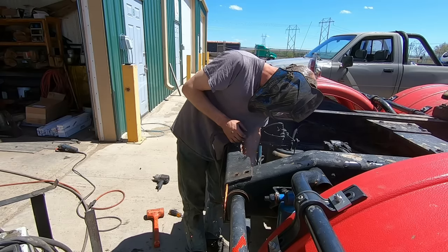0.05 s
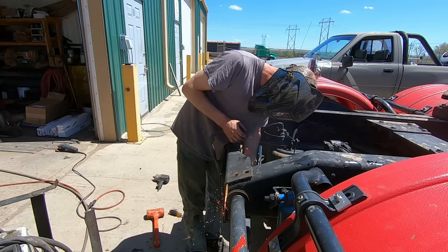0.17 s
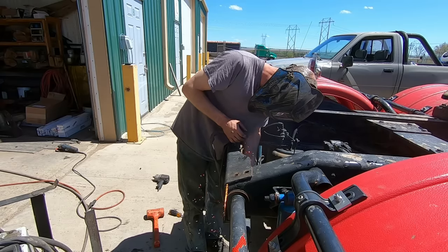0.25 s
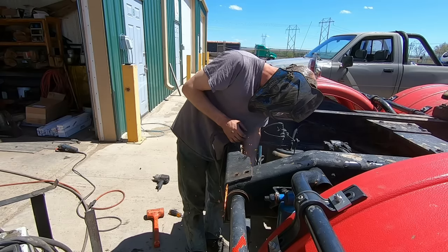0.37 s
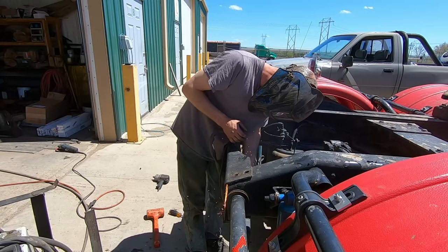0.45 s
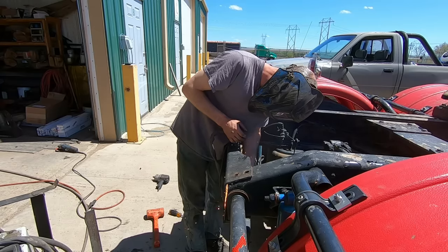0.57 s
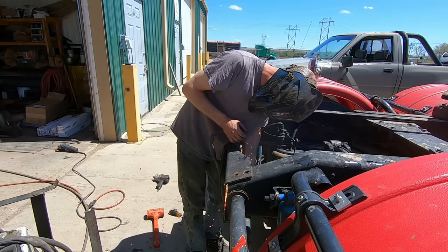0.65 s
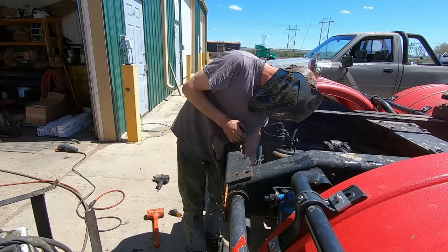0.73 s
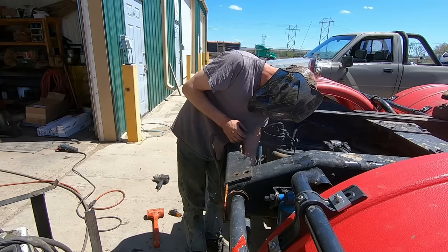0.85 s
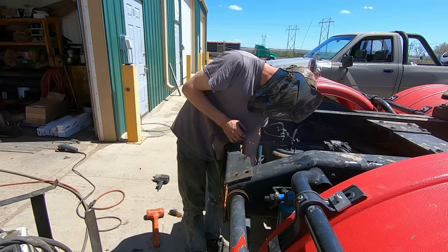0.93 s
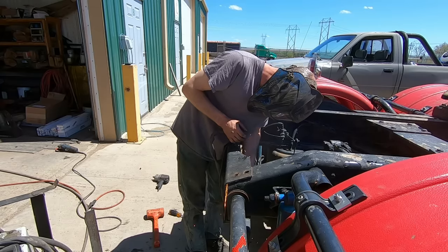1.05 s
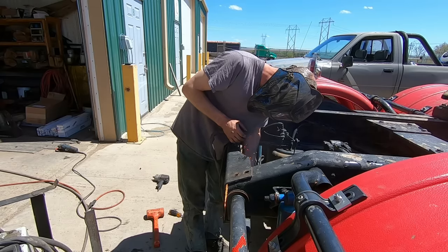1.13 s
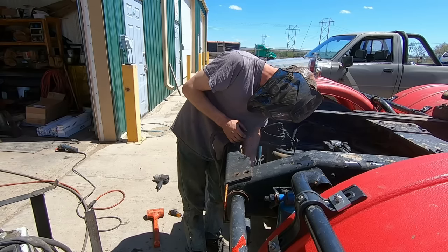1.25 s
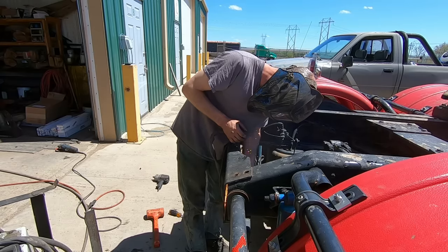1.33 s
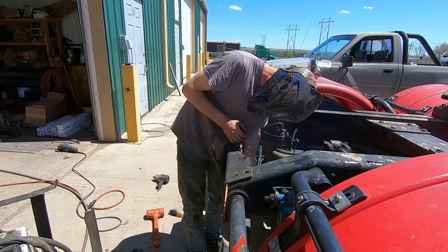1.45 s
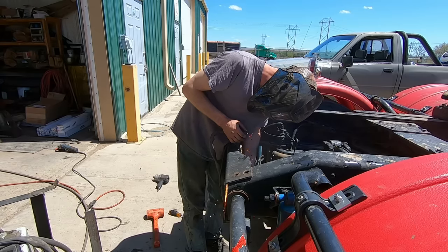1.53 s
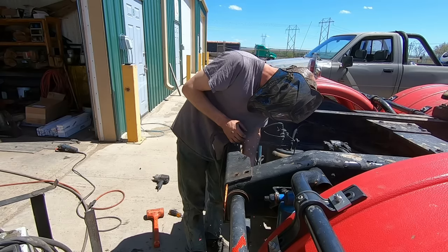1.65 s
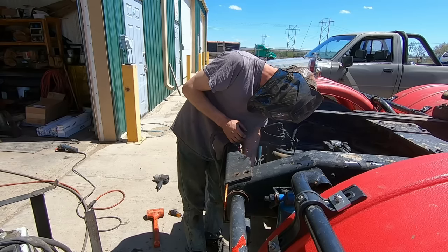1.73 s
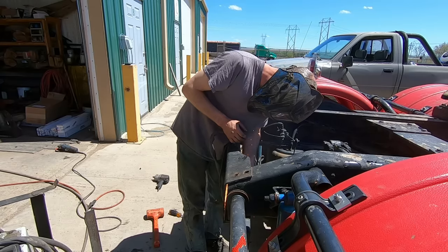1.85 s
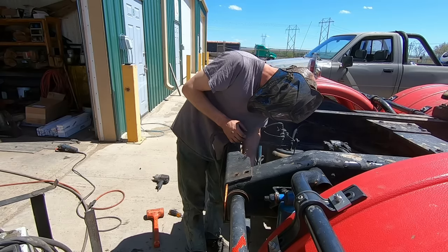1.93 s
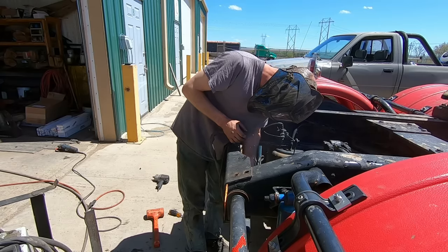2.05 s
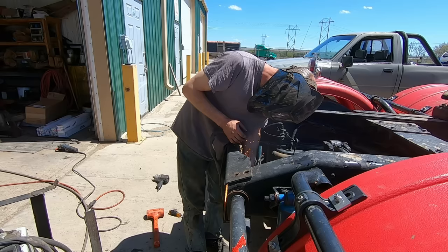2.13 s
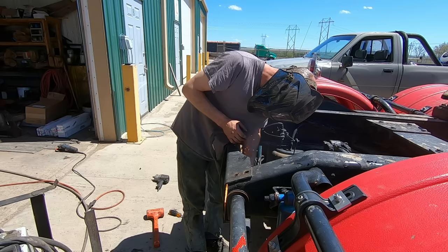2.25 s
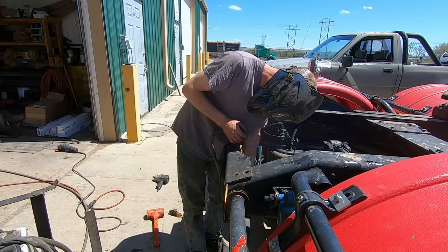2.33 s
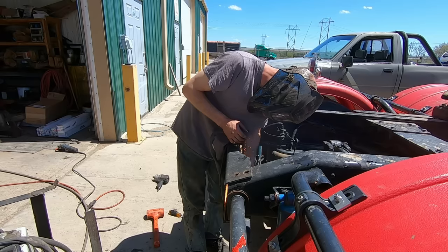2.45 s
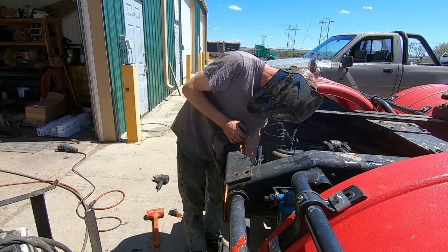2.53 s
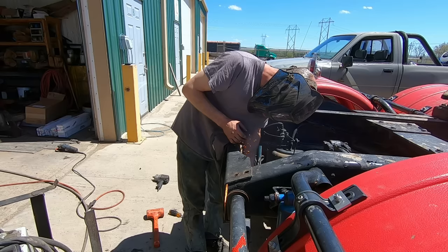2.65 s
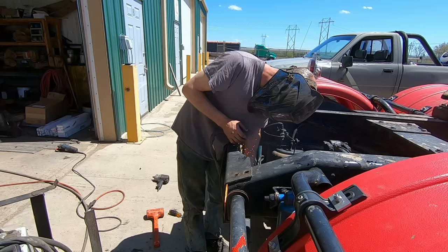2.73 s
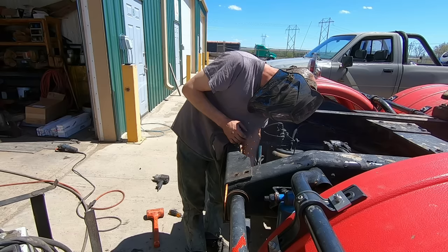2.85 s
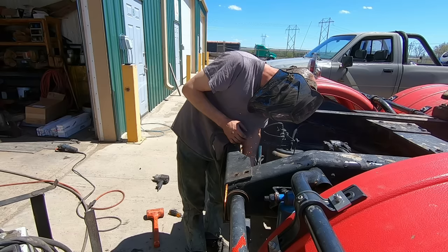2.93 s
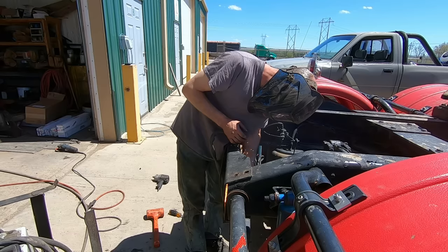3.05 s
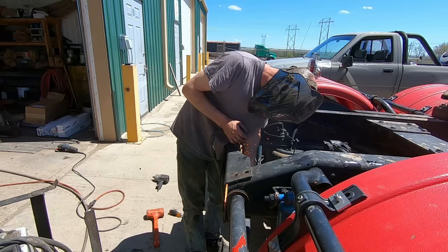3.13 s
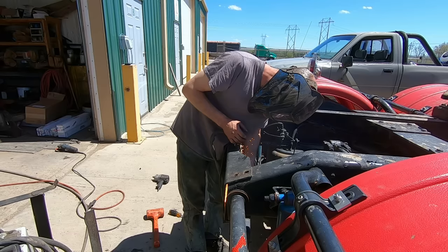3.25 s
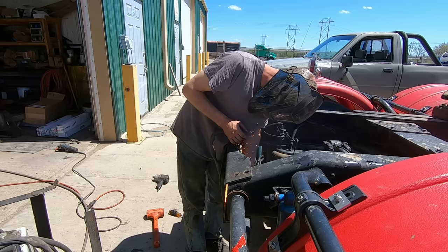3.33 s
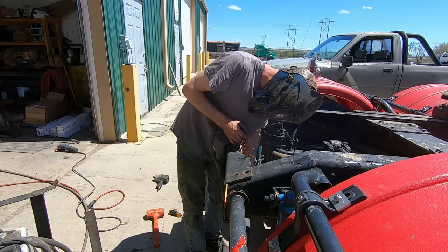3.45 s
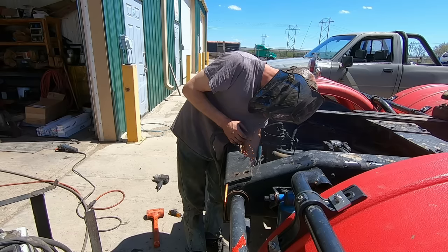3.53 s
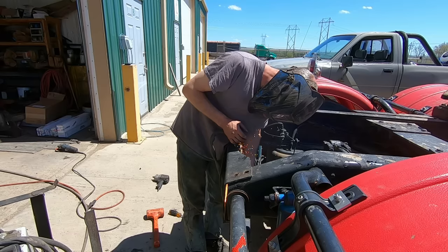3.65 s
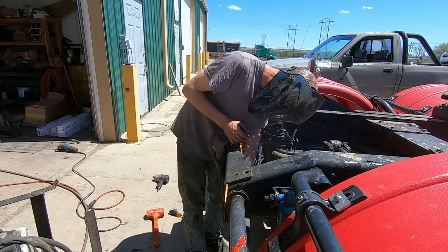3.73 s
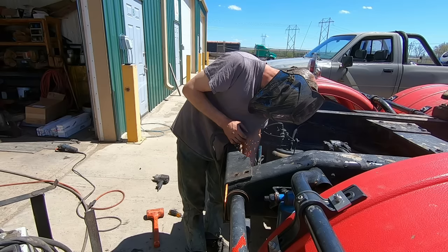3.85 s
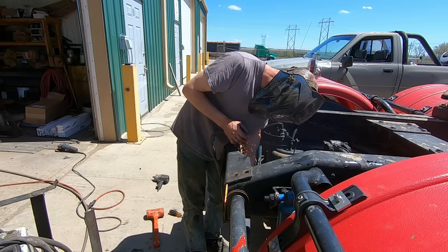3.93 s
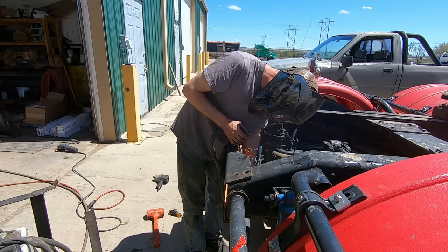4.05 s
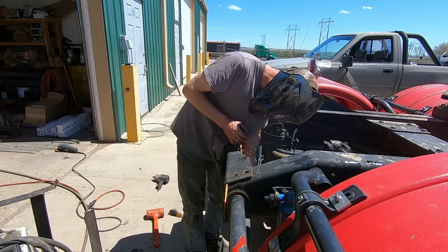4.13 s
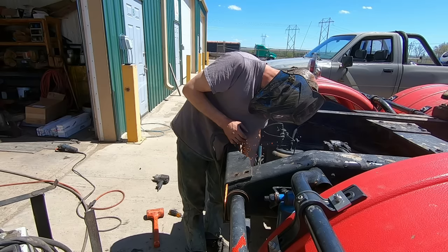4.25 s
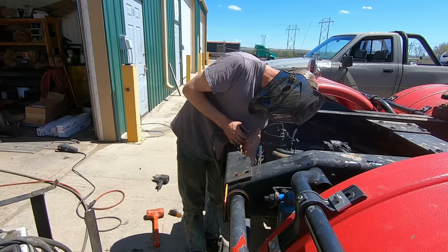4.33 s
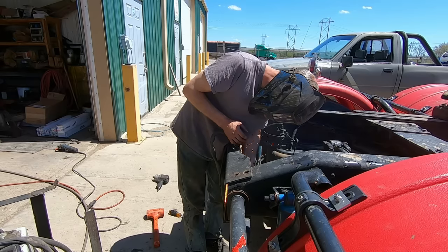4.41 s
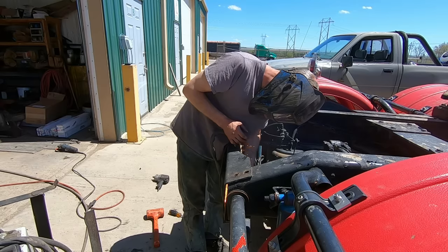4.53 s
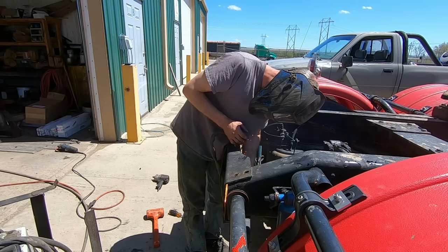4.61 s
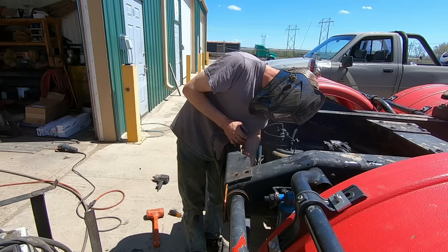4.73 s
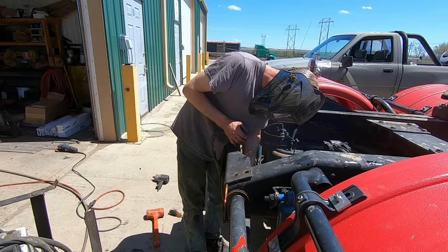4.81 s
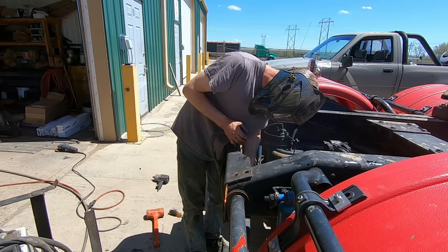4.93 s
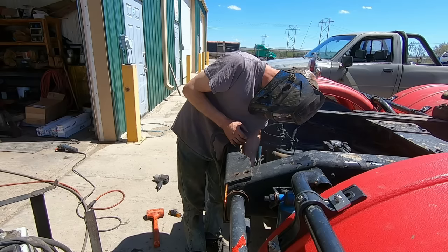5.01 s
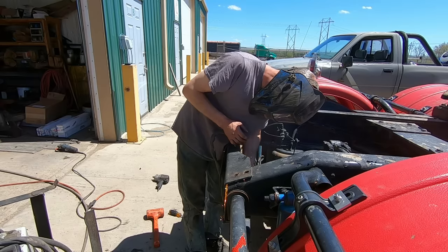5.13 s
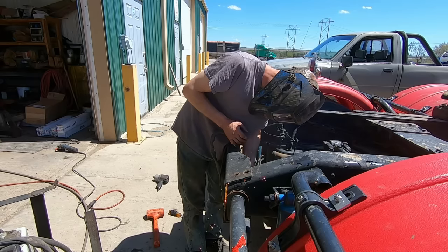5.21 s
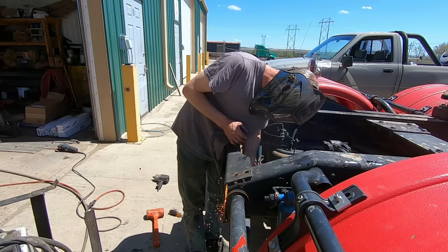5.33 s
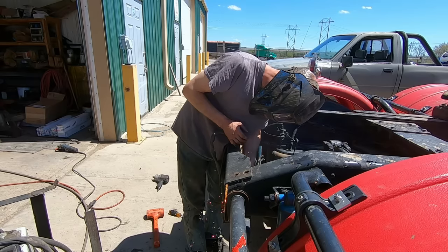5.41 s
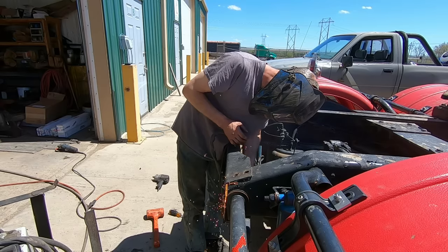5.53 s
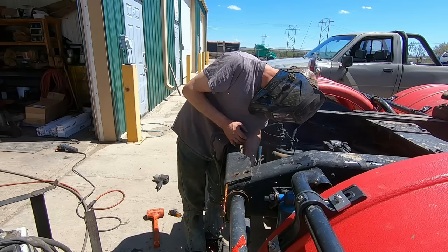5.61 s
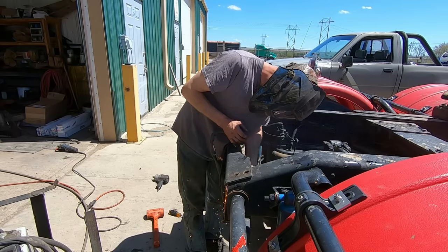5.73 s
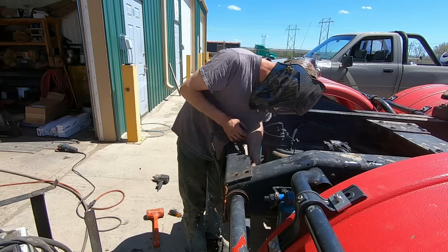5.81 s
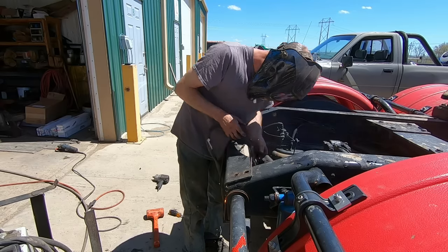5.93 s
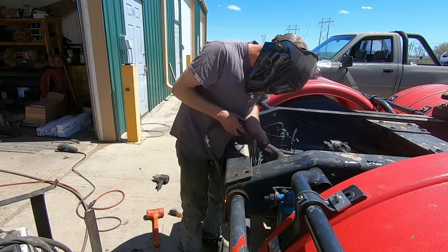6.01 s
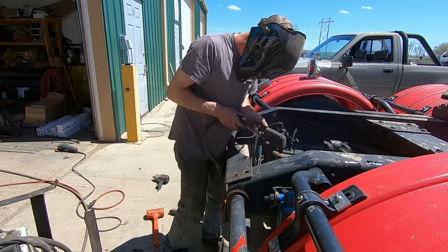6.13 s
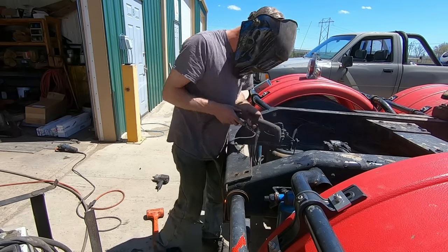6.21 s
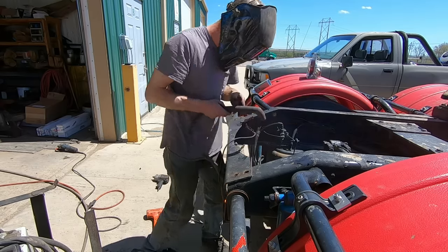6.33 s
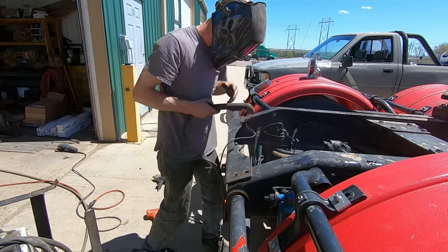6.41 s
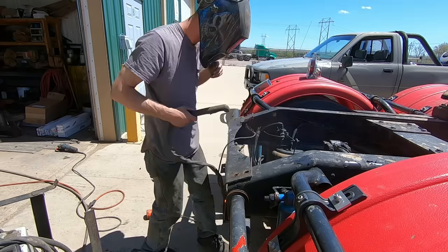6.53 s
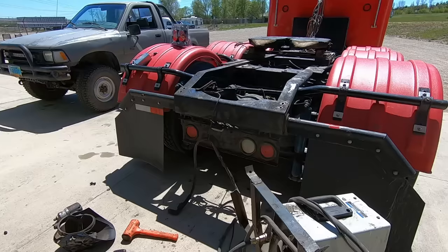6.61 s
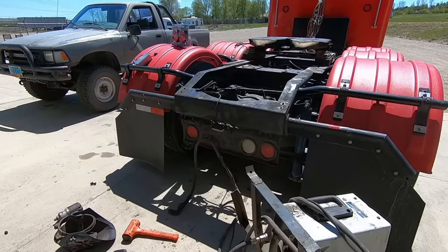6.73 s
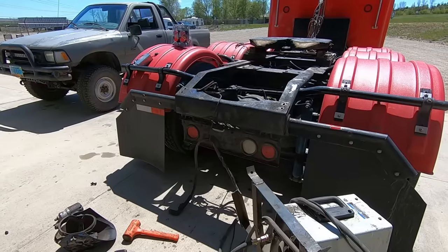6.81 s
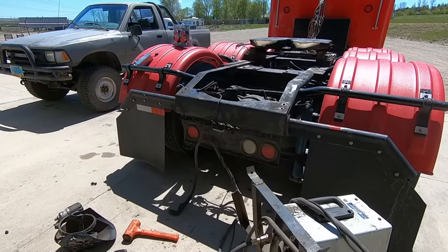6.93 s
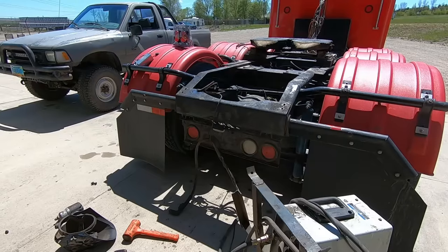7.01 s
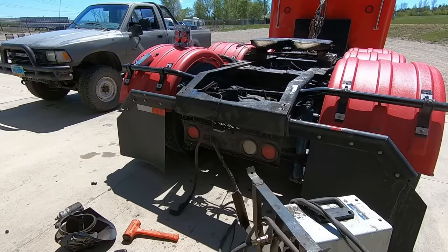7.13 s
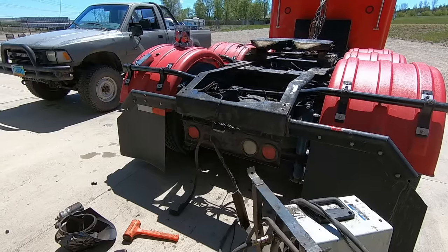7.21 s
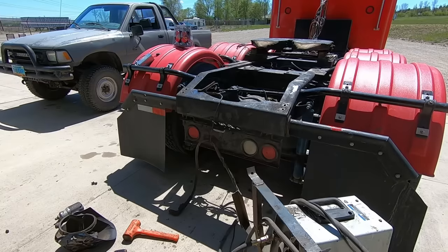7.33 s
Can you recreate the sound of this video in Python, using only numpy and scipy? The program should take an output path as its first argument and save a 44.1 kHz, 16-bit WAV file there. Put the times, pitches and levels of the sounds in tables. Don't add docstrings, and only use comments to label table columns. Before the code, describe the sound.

Harsh sputtering jet hiss over a faint engine idle, a low pop as the arc dies, airy whistle, brief silence, then buffeting wind and creaks.

```python
import sys
import numpy as np
from scipy import signal
from scipy.fft import rfft, irfft, next_fast_len
from scipy.io import wavfile
from scipy.ndimage import uniform_filter1d, map_coordinates

SR = 44100
rng = np.random.default_rng(int(sys.argv[2]) if len(sys.argv) > 2 else 0)


def dump_mix(stems):
    frames = np.atleast_2d(stems).T
    limited = np.clip(frames, -1, 1)
    pcm = np.round(limited * 32767).astype(np.int16)
    wavfile.write(sys.argv[1], SR, pcm)


def attenuation_scalar(level_db):
    decades = np.asarray(level_db, float) / 20
    return 10 ** decades


N = 324558

# t/s, arc stretch/dB, bite into steel/dB
TORCH_MOVES = [
    (0, -0.5, 1),
    (.6, -0.3, 0),
    (1.2, -3, -1),
    (1.8, 2, -2.5),
    (2.4, -1, -1.5),
    (3.4, 3.5, -0.8),
    (4.3, 5, -1.15),
    (5.2, 2, 2.5),
    (5.79, -6.5, 3),
]
# f/Hz, left level/dB, right level/dB
JET_BODY = [(318, -6, -18), (366, -16, -12), (520, -7, -9.5), (676, -14, -12.5), (876, -9.5, -9.5),
            (1050, -13, -7.5), (1380, -5.5, -3), (1650, -8, -3), (2000, -3, -2.1), (2640, -5, -3),
            (3300, -6.5, 0.5), (3800, -3, -2), (4240, -7.5, -2)]
# f/Hz, left level/dB, right level/dB
JET_HISS = [(4414, -18.5, -14.5), (5320, -11.5, -9), (5830, -16, -6.5), (7040, -14, -0.5),
            (7600, -23, -3.5), (8050, -24, -9.5), (8370, -24.5, -8.5), (8930, -14.5, -17.5),
            (9660, -15.5, -8.5), (10330, -11, -10.5), (10960, -16.5, -13.5), (11960, -24.5, -22),
            (14000, -27.5, -26), (14400, -29.5, -37.5)]
# f/Hz, likeness/1
PORT_LIKENESS = [(300, 0.93), (700, 0.66), (1500, 0.93), (3800, 0.92), (5000, .75), (7000, 0.72),
                 (8100, 0.41), (10000, 0.71), (11800, .5), (13000, 0.59)]
# f/Hz, left lead/rad
LEFT_LEAD = [(0, 0), (780, -0.34), (1210, -0.55), (3270, 0.0), (4130, -0.0), (4480, -0.4), (4820, -0.55),
             (6200, -1.1), (6800, -0.0023), (7490, 0.061), (8610, 1), (9820, 0.31), (10400, 0.29),
             (14500, -0.3)]
STANCE_S = [.6, 2, 3.6, 5.1]
# delay/ms, share/1
RAIL_ECHOES = [
    [(1.462, 0.065), (1.512, 0.025), (2.096, 0.06), (2.23, .045), (2.686, .06), (3.684, 0.075),
     (7.926, -0.05)],
    [(1.752, -.07), (1.894, -0.04), (2.564, -0.1), (2.668, 0.063), (3.442, 0.096), (3.634, 0.11),
     (4.518, 0.087)],
    [(1.436, 0.021), (1.698, -.047), (2.808, -0.024), (3.468, 0.082), (3.642, 0.065), (4.486, 0.031),
     (4.612, -0.071)],
    [(1.14, -0.024), (1.444, 0.05), (1.802, -0.036), (2.594, -.047), (2.976, -0.02), (4.086, -0.078),
     (5.766, -.04)],
]
# delay/ms, left share/1, right share/1
WALL_ECHOES = [(7.025, -0.039, -0.08), (7.48, 0.11, 0.08), (7.805, -0.086, -0.034), (7.945, -0.089, -0.07),
               (8.27, -0.06, -0.015), (9.015, -0.076, -0.088), (9.76, 0.078, 0.055),
               (9.945, 0.048, -0.0067), (10.695, -0.0079, -0.056), (13.175, -0.05, -0.027),
               (14.765, 0.062, 0.04), (17.14, 0.047, 0.03)]
# start/s, end/s, f/Hz, width/Hz, boost/dB
FRAME_POCKETS = [
    (0.5, 1.35, 3360, 64, 1),
    (5.5, 4.2, 7900, 110, 0.5),
    (-2, 1.9, 1500, 36, -6),
    (5, 5.8, 4200, 1500, -9.5),
    (5.5, 6.1, 3500, 200, -3.5),
]
# t/s, level/dB
IDLE_LEVEL = [(0, -40.5), (.4, -39.5), (1.7, -42), (3, -41), (4.3, -43.5), (5, -41.5), (6, -41.5)]
# f/Hz, level/(dB per Hz)
YARD_RUMBLE = [(12, -39.5), (20, -7.5), (60, -2.5), (86, -5), (118, -1), (171, -8.5), (330, -15.5),
               (430, -43.5), (730, -120)]
FIRING_ORDERS = {4: -14.5, 5: -9.5, 6: -4.5, 9: -0.77, 10: 0.94, 12: -5.5, 16: -8.5, 18: -11, 21: -11.5}
# f/Hz, level/dB, t60/s
ARC_COLLAPSE = [(159, -26.5, 0.035), (245, -18, .04), (323, -25.5, 0.034), (500, -25, .014),
                (1000, -28.5, .0072)]
# f/Hz, left level/dB, right level/dB
AIR_NOZZLE = [(330, -14, -16), (500, -12.5, -14), (900, -9, -6.5), (1290, -5.5, -3), (1660, -11, -11),
              (3000, -16.5, -10.5), (4300, -22, -17), (5500, -15.5, -13), (6900, -19, -3), (8000, -20, -12),
              (9000, -27.5, -18.1), (10200, -15, -15), (11500, -28, -22.5), (14500, -29, -44)]
# start/s, end/s
CUT_S = (6.6385, 6.826)
# t/s, peak level/dB, half width/s
GUSTS = [
    (6.865, -38, 0.017),
    (6.94, -19, 0.023),
    (6.995, -19.5, 0.012),
    (7.065, -18.5, 0.026),
    (7.13, -21.5, 0.018),
    (7.2, -26, 0.047),
    (7.27, -31, 0.035),
    (7.35, -35, .03),
]
# f/Hz, level/(dB per Hz)
EDDIES = [(12, -37), (20, -3), (110, 0), (230, -10.5), (400, -21.5), (600, -28), (900, -36.5), (1500, -46),
          (2600, -100)]
# f/Hz, level/dB
CLOTH_RUSTLE = [(500, 0), (1200, -0.5), (2200, -5.5), (3100, -6), (4000, -13), (5000, -21.5), (7500, -33),
                (9500, -46), (12000, -75.5)]
# t/s, peak level/dB, half width/s
FINGER_SCUFF = [
    (7.335, -46.5, .009),
    (7.345, -33, 0.0019),
    (7.3525, -33, .0045),
]
# f/Hz, level/dB
SKIN_RUB = [(1200, -22), (1900, -3), (2800, 1.5), (3700, -3), (5000, -15), (7500, -29), (11000, -40),
            (13000, -58)]
# t/s, peak level/dB, f/Hz
CASE_CREAKS = [
    (6.8502, -40, 2290),
    (6.8543, -39, 2350),
    (6.867, -43, 2350),
    (6.8755, -36, 2700),
    (6.8798, -35, 700),
    (6.8831, -29.5, 2750),
    (6.8915, -40, 3000),
    (6.9635, -37, 1300),
    (6.99, -37, 1930),
]

SNAP_S = 5.8003


def unit(x):
    return x / np.sqrt(np.mean(x ** 2) + 1e-20)


def along(points, hz):
    f, *cols = np.transpose(points)
    return np.array([np.interp(np.log(hz + 1), np.log(f + 1), c) for c in cols])


def closed(points, hz, skirt):
    lo_hz, hi_hz = points[0][0], points[-1][0]
    fade = (1 + (lo_hz / (hz + 1)) ** skirt) * (1 + (hz / hi_hz) ** skirt)
    return attenuation_scalar(along(points, hz)) / np.sqrt(fade)


def curves(rows):
    s, *cols = np.transpose(rows)
    return [np.interp(np.arange(N) / SR, s, c) for c in cols]


def wobble(rate_hz):
    knots = rng.standard_normal(int(N * rate_hz / SR) + 4)
    return map_coordinates(knots, [np.arange(N) * rate_hz / SR])


def filtered(x, response):
    m = next_fast_len(N + 4096)
    return irfft(rfft(x, m) * response(np.fft.rfftfreq(m, 1 / SR)), m)[..., :N]


def since(s):
    return np.maximum(np.arange(N) / SR - s, 0)


def after(s, fade_s):
    return np.clip((np.arange(N) / SR - s) / fade_s, 0, 1)


def swells(rows):
    t = np.arange(N) / SR
    power = sum(attenuation_scalar(2 * db) * np.exp(-((t - s) / width_s) ** 2) for s, db, width_s in rows)
    return 10 * np.log10(1e-12 + power)


def layer(noise, spectrum, lo_hz, hi_hz, skirt):
    x = filtered(noise, lambda hz: closed(spectrum, hz, skirt))
    band = filtered(x.mean(0), lambda hz: (hz > lo_hz) & (hz < hi_hz))
    return x / np.std(band)


def tilted(x, split_hz, low_db, high_db):
    low = filtered(x, lambda hz: 1 / (1 + (hz / split_hz) ** 8))
    return attenuation_scalar(low_db) * low + attenuation_scalar(high_db) * (x - low)


def recovery_db():
    return 7.5 * (1 - np.exp(-since(6.2) / 0.22))


def turbulence(patchy_db):
    z = signal.stft(rng.standard_normal((2, N)), nperseg=512)[2]
    field = uniform_filter1d(rng.standard_normal(z.shape[1:]), size=8, axis=0)
    field = uniform_filter1d(field, size=20, axis=1)
    pair = signal.istft(z * attenuation_scalar(patchy_db * unit(field)), nperseg=512)[1][:, :N]

    def spread(hz):
        angle = np.arccos(np.clip(along(PORT_LIKENESS, hz)[0], -1, 1)) / 2
        return np.array([np.cos(angle), np.sin(angle)])

    mid, side = filtered(pair, spread)
    stereo = np.array([mid + side, mid - side])
    return filtered(stereo, lambda hz: np.exp(.5j * along(LEFT_LEAD, hz) * [[1], [-1]]))


def echoed(x, echoes):
    hz = np.linspace(0, SR / 2, 1025)
    ms, *shares = np.transpose(echoes)
    log_response = np.array(shares) @ np.exp(-2j * np.pi * np.outer(ms / 1000, hz))
    return signal.oaconvolve(x, irfft(np.exp(log_response)), axes=1)[:, :N]


def rails(x, strength, clutter):
    out = 0
    place = np.interp(np.arange(N) / SR, STANCE_S, np.arange(len(RAIL_ECHOES)))
    for k, echoes in enumerate(RAIL_ECHOES):
        small = rng.standard_normal((80, 3))
        delay_ms = 1.5 + 7 * abs(small[:, 0])
        left, right = small[:, 1], small[:, 1] + .6 * small[:, 2]
        crowd = np.c_[delay_ms, clutter * left, clutter * right]
        strong = np.array(echoes)[:, [0, 1, 1]] * [1, 0.75 * strength, strength]
        near = np.clip(2 * (.75 - abs(place - k)), 0, 1)
        out = out + near * echoed(x, np.r_[strong, crowd])
    return out


def pockets(x):
    for start_s, end_s, hz, width_hz, db in FRAME_POCKETS:
        ring = filtered(x, lambda f: 1j * f * width_hz / (hz * hz - f * f + 1j * f * width_hz))
        x = x + attenuation_scalar(db) * after(start_s, .2) * (1 - after(end_s - .2, 0.38)) * ring
    return x


def arc():
    stretch_db, bite_db = curves(TORCH_MOVES)
    hiss_db, sizzle_db = -23.5, -25.5 + stretch_db
    roar_db, body_db = -31.5 - 0.31 * stretch_db + 0.092 * bite_db, -33 + bite_db
    sputter_db = 0.14 * wobble(4.935) + 0.33 * wobble(12) + 0.43 * wobble(300)
    noise = attenuation_scalar(sputter_db) * turbulence(patchy_db=.9)
    noise = pockets(rails(noise, strength=1.6, clutter=.032))
    hiss = tilted(layer(noise, JET_HISS, 4500, 9000, skirt=35), 10000, hiss_db, sizzle_db)
    body = layer(echoed(noise, WALL_ECHOES), JET_BODY, 1200, 4300, skirt=24)
    body = tilted(body, 1800, roar_db, body_db)
    t = since(SNAP_S + .006)
    stop = 0.54 * attenuation_scalar(-60 * t / 0.037)

    def yard(t60_s):
        return .45 * attenuation_scalar(-60 * t / t60_s) * (1 - .68 * after(5.92, .008))

    jet = hiss * (stop + yard(1.0)) + body * (stop + yard(2.2))
    return filtered(jet, lambda hz: hz < 14400)


def engine():
    cycle_hz = 12.55
    crank = 2 * np.pi * cycle_hz * np.arange(N) / SR + .1 * wobble(2.5)
    lines = 0
    for k, db in FIRING_ORDERS.items():
        lines = lines + attenuation_scalar(db + 1.6 * wobble(3.5)) * np.sin(k * crank + .5 * wobble(3.5) + k * k)
    mid, side = filtered(rng.standard_normal((2, N)), lambda hz: attenuation_scalar(along(YARD_RUMBLE, hz)))
    rumble = unit(np.array([mid + 0.22 * side, mid - 0.33 * side]))
    level_db = curves(IDLE_LEVEL)[0] + .85 * recovery_db()
    return attenuation_scalar(level_db) * unit(rumble + attenuation_scalar(-0.5) * unit(lines))


def snap():
    t = since(SNAP_S)
    push = 0
    for hz, db, t60_s in ARC_COLLAPSE:
        push = push - attenuation_scalar(db - 60 * t / t60_s) * np.sin(2 * np.pi * hz * t)

    def low_air(hz):
        return (hz / 150) ** 2 / (1 + (hz / 150) ** 2) / (1 + (hz / 800) ** 2)

    puff = attenuation_scalar(-31 - 60 * t / 0.2) * unit(filtered(rng.standard_normal(N), low_air))
    return push * after(SNAP_S, 0.0011) + after(SNAP_S, .003) * puff


def cooling_air():
    hiss_db, body_db = -42 + recovery_db(), -39 + 0.28 * recovery_db()
    jet = layer(turbulence(patchy_db=1.2), AIR_NOZZLE, 4500, 14000, skirt=38)
    body_rms = np.std(filtered(jet.mean(0), lambda hz: hz < 4300))
    blow = tilted(jet, 3900, body_db - 20 * np.log10(body_rms), hiss_db)
    whistle_s = 6.2
    whistle_hz = 1286 - 194 * since(whistle_s)
    whistle_db = -41 - 16 * (1 - after(whistle_s, 0.12))
    breathy = attenuation_scalar(1.2 * wobble(25)) + .5 * wobble(350)
    phase = 2 * np.pi * np.cumsum(whistle_hz + 6 * wobble(40)) / SR
    tone = np.sqrt(2) * attenuation_scalar(whistle_db) * breathy * np.sin(phase)
    stereo_tone = after(whistle_s, .02) * tone * attenuation_scalar([[-.8], [.8]])
    return after(SNAP_S, 0.028) * blow + stereo_tone


def wind():
    eddies = filtered(rng.standard_normal(N), lambda hz: attenuation_scalar(along(EDDIES, hz)[0]))
    eddies = eddies / np.sqrt(abs(uniform_filter1d(eddies ** 2, size=1500)) + 1e-9)
    thump_db = swells(GUSTS)
    flutter_db = 1.2 * (thump_db + 21) - 14 - 28.5 * since(GUSTS[1][0])
    x = tilted(eddies, 150, thump_db, flutter_db + 1.2 * wobble(70))
    return x / (1 + abs(x / .28) ** 4) ** (1 / 4)


def rubbing(spectrum):
    return unit(filtered(rng.standard_normal(N), lambda hz: closed(spectrum, hz, 4)[0]))


def rustle():
    start_s = CUT_S[1]
    level = after(start_s, 0.045) ** 2 * attenuation_scalar(-51 + 11 * since(start_s))
    return level * attenuation_scalar(1.2 * wobble(90)) * rubbing(CLOTH_RUSTLE)


def creaks():
    x, t = np.zeros(N), np.arange(1000) / SR
    for s, db, hz in CASE_CREAKS:
        w = 2 * np.pi * hz * t
        tick = 1.1 * attenuation_scalar(-60 * t / .016) * (np.sin(1.22 * w) + .6 * np.sin(1.5 * w))
        envelope = attenuation_scalar(db - 60 * t / .02) * (1 - np.exp(-t / .0007))
        x[round(s * SR):][:len(t)] += envelope * (np.sin(w) + tick)
    return x


def handheld():
    scuff = attenuation_scalar(swells(FINGER_SCUFF)) * rubbing(SKIN_RUB)
    return wind() + rustle() + creaks() + scuff


def scene():
    torch_yard = arc() + engine() + snap() + cooling_air()
    before_cut = np.arange(N) < CUT_S[0] * SR
    return torch_yard * before_cut + after(CUT_S[1], 0.014) ** 2 * handheld()


def top_cut(x):
    return signal.sosfilt(signal.butter(12, 14860, fs=SR, output="sos"), x)


def record(dry):
    soft = dry / (1 + abs(dry / .55) ** 4) ** (1 / 4)
    return top_cut(soft)


dry = scene()
out = record(dry)
dump_mix(out)
```